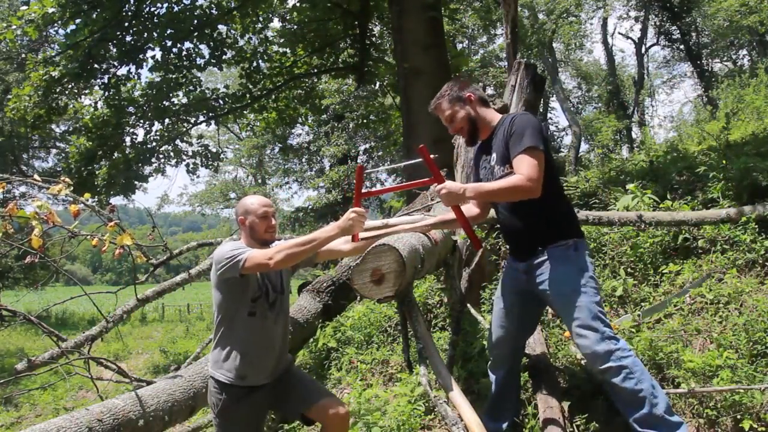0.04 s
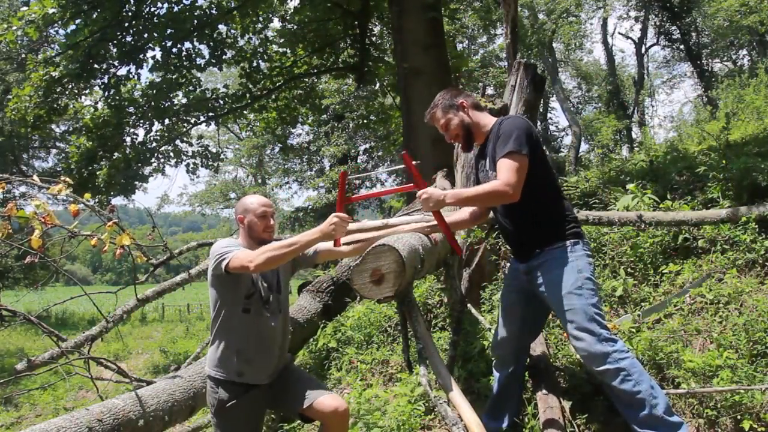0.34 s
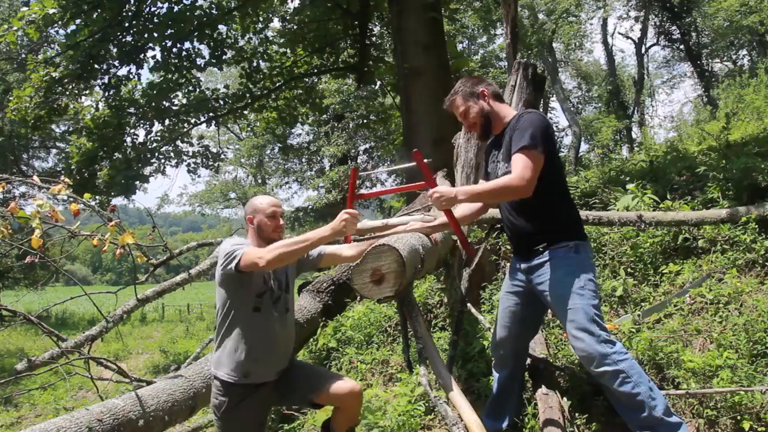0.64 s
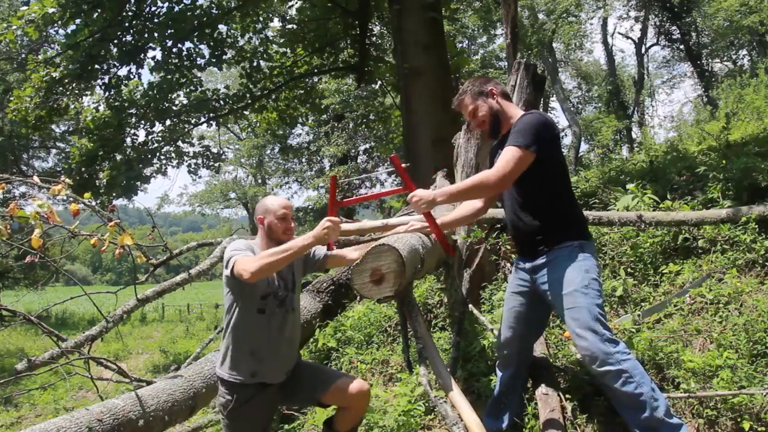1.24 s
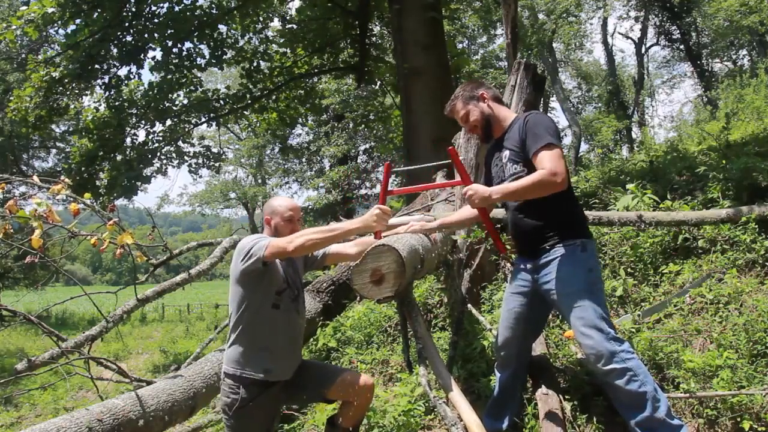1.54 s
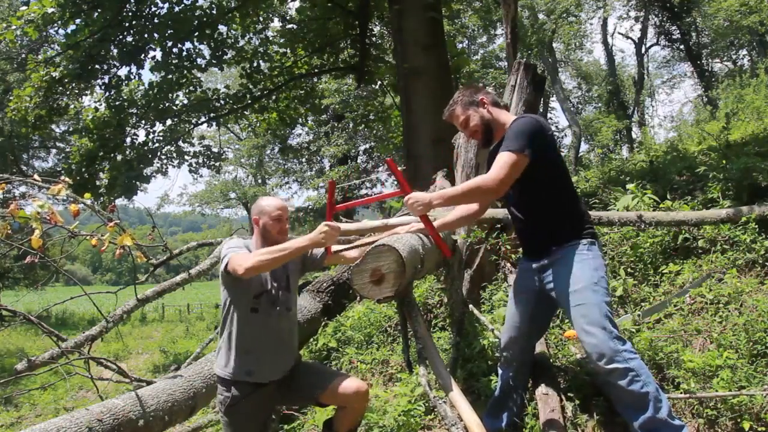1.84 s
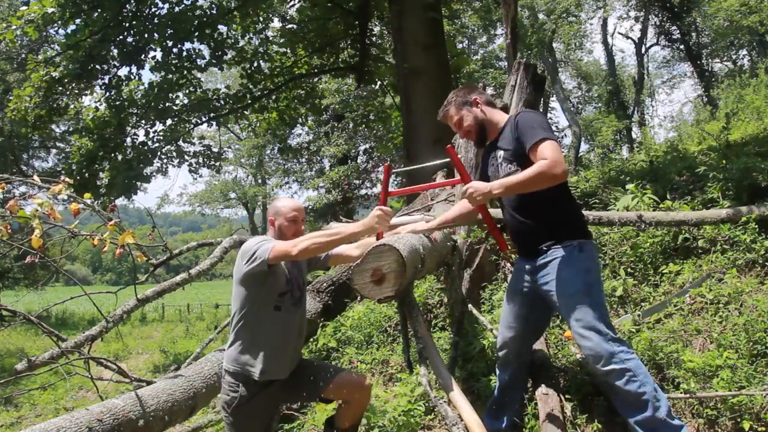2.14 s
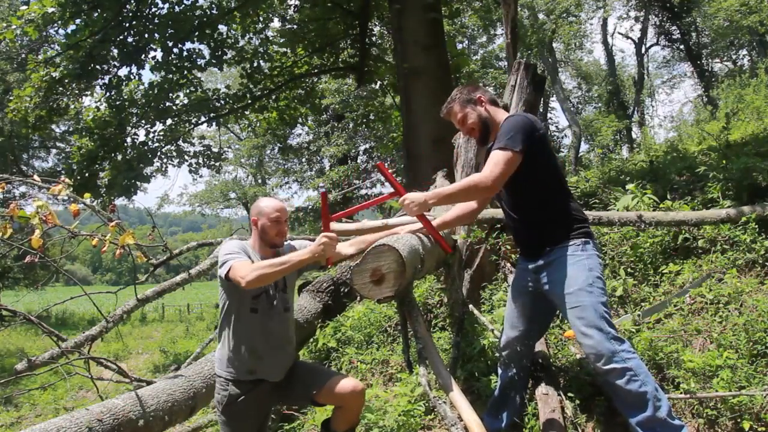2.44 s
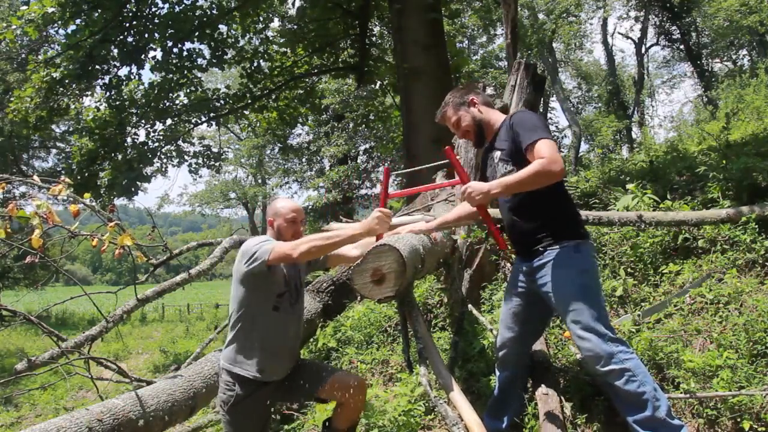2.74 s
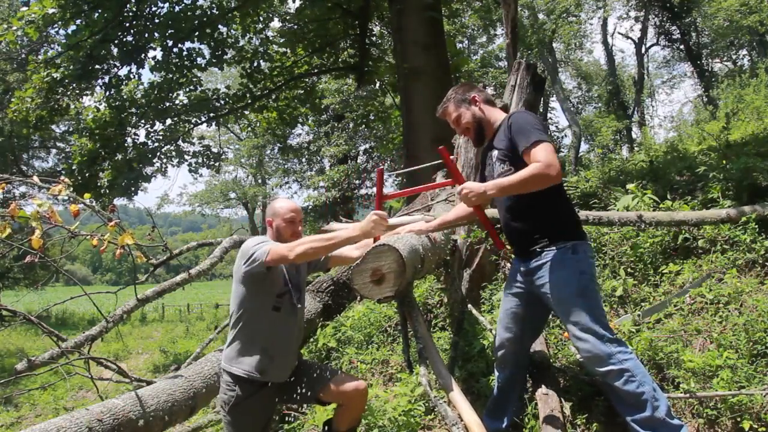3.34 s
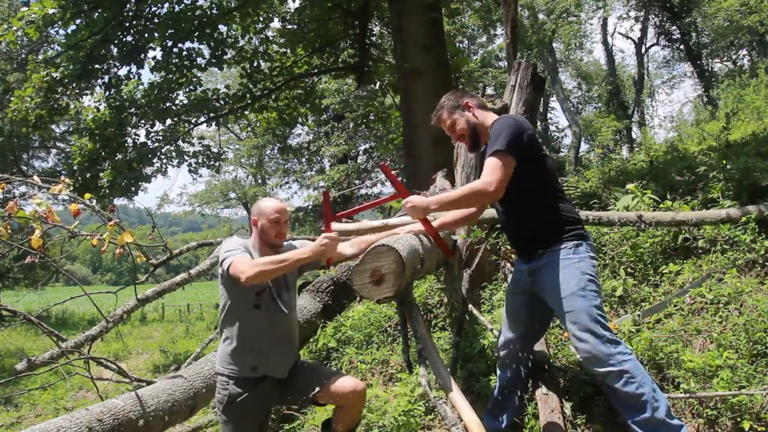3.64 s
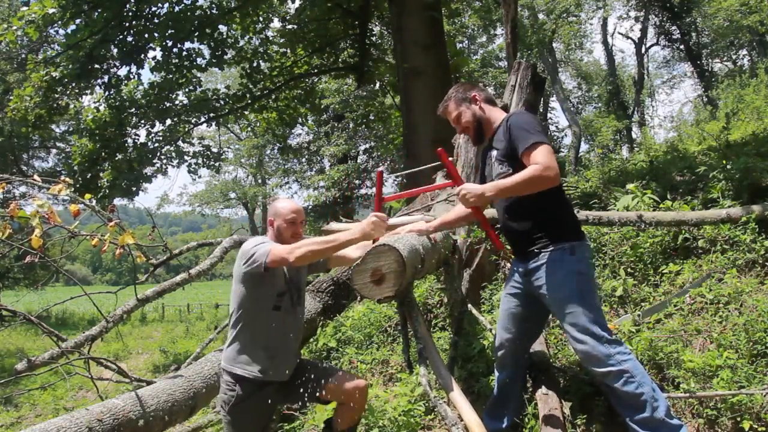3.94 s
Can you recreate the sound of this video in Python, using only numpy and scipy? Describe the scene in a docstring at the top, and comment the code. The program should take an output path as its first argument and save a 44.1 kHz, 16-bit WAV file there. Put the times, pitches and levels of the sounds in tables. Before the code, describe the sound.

A frame saw cuts through a log outdoors, starting with short, thin scrapes and settling into full rasping strokes that make the blade ring. Light wind rumbles on the microphone, fades and returns, over a faint hiss of leaves.

```python
"""Two people pull a frame saw through a log at the edge of a wood, in light wind and a faint hiss.
The first strokes are short and scrape thinly. From about 1 s the saw swings fully back and forth:
teeth tear the fibres in a dense rasp that rings blade and frame, and one direction bites harder.
Between 1.4 and 2.8 s the blade chatters three times on the log while the wind dies down.
The wind then returns, rumbling on the microphone, with its hardest puff near 3.7 s."""
import sys
import numpy as np
from scipy import signal
from scipy.fft import rfft, irfft, next_fast_len
from scipy.io import wavfile
from scipy.ndimage import uniform_filter1d, map_coordinates

SR = 44100
rng = np.random.default_rng(int(sys.argv[2]) if len(sys.argv) > 2 else 0)


def store_pcm(level_fs):
    """Save levels as 16-bit WAV."""
    pcm = np.round(np.clip(level_fs, -1, 1) * 32767).astype(np.int16)
    wavfile.write(sys.argv[1], SR, np.atleast_2d(pcm).T)


N = 176400
TIME_S = np.arange(N) / SR


def saw():
    """Superposition: the cutting force excites a direct rasp, the saw's modes and the blade's tone."""
    treble_hz, woody_hz = 5630, 1110
    speed, position, direction, force, treble_gain, sing_gain = strokes()
    rasping = rasp(force * tearing(speed), direction)
    ringing = saw_modes(force * tearing(speed), position, direction)
    singing = blade_tone(force * sing_gain, position)
    sound = amp(-0.5) * patchy(rasping, depth_db=2.5) + amp(1.5) * ringing
    highs = filtered(sound, lambda hz: hz ** 4 / (hz ** 4 + treble_hz ** 4))
    lows = filtered(sound, lambda hz: woody_hz ** 4 / (hz ** 4 + woody_hz ** 4))
    woody_gain = amp(speed ** 2 - 2)  # a slow blade sounds less woody
    return sound + (treble_gain - 1) * highs + (woody_gain - 1) * lows + singing


# Saw strokes: start_s, end_s, level_db, swell_db, direction (1 biting, -1 return), treble_db, sing_db
SAW_STROKES = [(-.15, 0.11, -51.5, 12, -1, 0, -15), (0.266, 0.493, -40, 10, 1, -2.5, -6),
               (0.474, 0.618, -55, 0, -1, -0.5, -7), (0.627, 0.899, -38.3, -2, -1, -1, -0.5),
               (0.974, 1.274, -33, 2.5, 1, -0.3, -5), (1.315, 1.59, -36, -1.5, -1, -1.5, 0.5),
               (1.641, 1.909, -30.5, 1, 1, -0.5, 1), (1.959, 2.238, -37.5, 6.5, -1, -1.5, -3),
               (2.265, 2.537, -29.5, 6, 1, 0, -0.5), (2.587, 2.872, -35, 0.5, -1, -1, 4.5),
               (2.904, 3.162, -30, 1.5, 1, 0, -1.5), (3.204, 3.483, -38, 0.5, -1, -1.5, -4),
               (3.514, 3.782, -30, 1, 1, 0.5, 3), (3.817, 4.09, -36.5, -2, -1, 0, -3)]
# Teeth catching or skipping: time_s, half_length_s, bite_change_db
TOOTH_CATCHES = [(0.275, 0.024, 10), (0.433, 0.023, 4), (1.036, 0.018, -4.5), (1.061, .025, 3),
                 (1.32, 0.014, 5), (1.365, 0.01, -6.5), (1.454, .02, 2), (1.669, 0.02, -3.5),
                 (1.687, 0.005, 4.5), (1.713, 0.0068, -2.5), (1.971, 0.011, 11.5), (2.296, 0.019, 3.5),
                 (2.633, 0.0067, -6.5), (2.691, 0.018, -5), (3.231, 0.0091, 6.5), (3.292, .02, 1.5),
                 (3.364, 0.026, 3), (3.445, 0.011, 6), (3.664, 0.013, 3), (3.844, 0.0047, 8)]
# Share of the blade in use: time_s, length_fraction
BLADE_REACH = [(0, .25), (.45, 0.22), (.75, 0.86)]
def strokes():
    """Harmonic motion: each stroke is half a cycle; force grows as a power of speed, then saturates."""
    full_bite_speed, speed_exponent, ease_s = 0.71, 1.28, 0.031
    speed, position, direction, force, sing_gain = np.zeros((5, N))
    treble_gain = np.ones(N)
    for start_s, end_s, level_db, swell_db, sign, treble_db, sing_db in SAW_STROKES:
        on = (TIME_S > start_s) & (TIME_S < end_s)
        progress = (TIME_S[on] - start_s) / (end_s - start_s)
        speed[on] = np.sin(np.pi * progress)  # fraction of top speed
        position[on] = sign * np.cos(np.pi * progress)  # highest where a biting stroke starts
        direction[on], treble_gain[on], sing_gain[on] = sign, amp(treble_db), amp(sing_db)
        bite = np.tanh((speed[on] / full_bite_speed) ** speed_exponent)
        force[on] += amp(level_db + swell_db * (progress - .5)) * bite
    position = (position + 1) * np.interp(TIME_S, *np.transpose(BLADE_REACH)) - 1
    catch_db = sum(db * swell(time_s, half_s) for time_s, half_s, db in TOOTH_CATCHES)
    force = np.abs(uniform_filter1d(force, size=int(ease_s * SR)))  # the springy frame eases each turn
    return speed, position, direction, force * amp(catch_db), treble_gain, sing_gain


def tearing(speed):
    """Shot noise: fibres snap and rub, modulated by the passing teeth and the judder of the blade."""
    top_tooth_hz, tooth_db, judder_hz, judder_db = 519, 3.5, 69.54, 1.75
    snap_spread_db, rub_db = 2.5, -1.5
    snap_chance = 6000 * (speed + .1) / SR
    snaps = (rng.random(N) < snap_chance) * rng.choice([-1, 1], N)
    snaps = snaps * amp(snap_spread_db * rng.standard_normal(N))
    grit = unit(snaps / np.sqrt(snap_chance)) + amp(rub_db) * rng.standard_normal(N)
    tooth_hz = top_tooth_hz * speed * (1 + .12 * wobble(60))
    teeth = np.cos(2 * np.pi * np.cumsum(tooth_hz) / SR)
    return unit(grit * amp(tooth_db * teeth + judder_db * wobble(judder_hz)))


# Rasp spectra of the biting and the return stroke: frequency_hz, gain_db
BITE_SPECTRUM = [(100, -4), (280, -1.5), (600, -1), (1200, 2), (2600, 3), (3900, 3), (5200, -3), (7000, -6),
                 (8500, -4.5), (11000, -3.5), (13000, -5.5), (16000, -9)]
RETURN_SPECTRUM = [(100, -22), (280, 2), (600, 3), (1200, -1), (2600, 2.5), (3900, 4), (5200, -0.5),
                   (7000, -3.5), (8500, -1.5), (11000, 0), (13000, -3), (16000, -4.5)]
def rasp(cut, direction):
    """Source and filter: tearing noise radiates from the cut with one spectrum for each direction."""
    biting = filtered(cut * (direction > 0), colour(BITE_SPECTRUM))
    returning = filtered(cut * (direction <= 0), colour(RETURN_SPECTRUM))
    return biting + returning


# Modes of blade and frame: pitch_hz, bandwidth_hz, level_db, position_slope_db, direction_slope_db
SAW_MODES = [(354.2, 16.1, 5.5, 4.5, -4), (456, 39.3, 7.5, 0.5, -1), (631.5, 29, 11, -1, -1),
             (1011, 78, 2.5, 0, -1.5), (1404.7, 36.5, 16, 1.5, -1.5), (1533, 206, 1.5, -1, -1),
             (1833, 110, 1.5, 1, -2.5), (2017, 80, -1.5, 2.5, -3), (2240, 32, 9.5, 3.5, 1),
             (2612, 72, 7, -2.5, -0.5), (2763, 79, 3.5, 8, 6), (3442, 67, 4, 3, -3),
             (3716, 155, 6, -2.5, 0), (4518, 68, 10, 13, -1), (4560, 40, -2, 15, 4.5),
             (5733, 43, 9.5, -0.5, -0.5), (6740, 430, 1.5, -2, -0.5), (7420, 65, 3, 4, -3.5),
             (9420, 50, -1.5, 5, -0.5), (9540, 61, 8, 1.5, -3), (11510, 230, 3, -1, -2),
             (13660, 300, -4.5, 0, -5)]
def saw_modes(drive, position, direction):
    """Forced vibration: how strongly each mode answers depends on where the log meets the blade."""
    frame_hz, deepen_db_per_s, wander_db = 1600, 0.55, 2.5
    deepen_db = deepen_db_per_s * (TIME_S - N / SR / 2)  # low modes grow as the cut deepens
    ring = np.zeros(N)
    for pitch_hz, bandwidth_hz, level_db, position_slope_db, direction_slope_db in SAW_MODES:
        gain_db = level_db + position_slope_db * position + direction_slope_db * direction
        gain_db += deepen_db * (pitch_hz < frame_hz) + wander_db * wobble(22.1)
        ring += resonance(drive * amp(gain_db), pitch_hz, bandwidth_hz)
    return ring


def blade_tone(force, position):
    """Energy storage: the taut blade takes energy from the cut and sings on through the turn."""
    pitch_hz, t60_s, blur_rad, waver_db = 4041, 0.27, 0.91, 0.6
    push = force * amp(-11 + 3.5 * position)
    retained = amp(-120 / (t60_s * SR))  # share of the energy left after one sample
    energy = signal.lfilter([1 - retained], [1, -retained], push ** 2)
    tone = np.sin(2 * np.pi * pitch_hz * TIME_S + blur_rad * wobble(45))
    return np.sqrt(np.abs(energy)) * unit(tone * amp(waver_db * wobble(24.28)))


# Chatter of the blade on the log: time_s, half_length_s, drive_db
BLADE_CHATTER = [(1.444, 0.026, -16.5), (1.753, 0.0076, -22), (2.768, 0.013, -19.5)]
def log_knocks():
    """Resonance: brief bursts of chatter draw a hollow note from the log."""
    pitch_hz = 621
    bursts = sum(amp(db) * swell(time_s, half_s) for time_s, half_s, db in BLADE_CHATTER)
    chatter = unit(filtered(rng.standard_normal(N), lambda hz: hz < 4 * pitch_hz))
    return resonance(bursts * chatter, pitch_hz, bandwidth_hz=22.6)


# Envelope of the opening scrape: time_s, level_db
SCRAPE_ENVELOPE = [(0, -56), (.24, -65), (.3, -66), (.48, -58.5), (.62, -53), (.9, -58), (.94, -79),
                   (.97, -45.5), (1.05, -88)]
# Spectrum of that scrape: frequency_hz, gain_db
SCRAPE_SPECTRUM = [(300, 11), (1500, 2), (5000, -14), (9000, -6), (12000, -11), (16000, -10)]
def scrape():
    """Sliding friction: the barely loaded blade scrapes thinly in the shallow cut."""
    friction = tearing(speed=np.full(N, .25))
    return level(SCRAPE_ENVELOPE) * unit(filtered(friction, colour(SCRAPE_SPECTRUM)))


def trees(sound):
    """Scattering: ground and trunks return a weak, dull tail that decays exponentially."""
    t60_s, cutoff_hz = 0.44, 4700
    delay_s = np.arange(SR // 2) / SR
    tail = rng.standard_normal(len(delay_s)) * amp(-60 * delay_s / t60_s)
    scatter = signal.fftconvolve(sound, tail / np.linalg.norm(tail))[:N]
    return amp(-14) * filtered(scatter, lambda hz: 1 / (1 + (hz / cutoff_hz) ** 2))


# Envelope of the breeze: time_s, level_db
BREEZE_ENVELOPE = [(0, -37.5), (.15, -34), (.8, -34.5), (1.1, -39.5), (1.3, -39), (1.7, -37), (2.0, -43),
                   (2.25, -47.5), (2.5, -55), (2.8, -49.5), (3.0, -40.5), (3.35, -34.5), (3.55, -40),
                   (4, -35.5)]
# Spectrum of its rumble: frequency_hz, gain_db
RUMBLE_SPECTRUM = [(10, -17), (22, -0.5), (34, 2.5), (50, -0.5), (70, 0.5), (100, -5), (150, -11.5),
                   (220, -21), (350, -34), (700, -36), (2000, -55.5)]
# Harder buffets: time_s, half_length_s, peak_db, pitch_hz
WIND_PUFFS = [(1.102, 0.027, -27, 65.6), (3.033, 0.017, -27.5, 56.3), (3.654, 0.019, -21.5, 56)]
def wind():
    """Turbulence: pressure fluctuations on the microphone make a low rumble with a few harder puffs."""
    puffs = np.zeros(N)
    for time_s, half_s, peak_db, pitch_hz in WIND_PUFFS:
        cycles = pitch_hz * (TIME_S - time_s) + rng.random()
        puffs += amp(peak_db) * swell(time_s, half_s) * np.sin(2 * np.pi * cycles)
    gusts = rng.standard_normal(N) * amp(1.5 * wobble(17))
    return puffs + level(BREEZE_ENVELOPE) * unit(filtered(gusts, colour(RUMBLE_SPECTRUM)))


# Spectrum of the outdoor hiss: frequency_hz, gain_db
HISS_SPECTRUM = [(100, 19.5), (450, 10.5), (900, 5), (2000, -3), (2900, 0), (3600, 3.5), (4400, -1.5),
                 (6200, -8), (7000, -2.5), (7450, 5), (8400, -5.5), (10000, -8), (16000, -26)]
def outdoor_hiss():
    """Stationary noise: a faint hiss of leaves, with a high band of distant insects."""
    return amp(-51.5) * unit(filtered(rng.standard_normal(N), colour(HISS_SPECTRUM)))


def amp(db):
    """Decibels to amplitude gain."""
    return 10 ** (np.asarray(db) / 20)


def unit(x):
    """Normalisation to rms 1."""
    return x / np.sqrt(np.mean(x ** 2) + 1e-20)


def colour(points):
    """Frequency response interpolated from (frequency_hz, gain_db) points."""
    frequency_hz, gain_db = np.transpose(points)
    return lambda hz: amp(np.interp(np.log(hz + 1), np.log(frequency_hz + 1), gain_db))


def level(points):
    """Amplitude envelope interpolated from (time_s, level_db) points."""
    return amp(np.interp(TIME_S, *np.transpose(points)))


def swell(time_s, half_length_s):
    """Gaussian envelope centred on time_s."""
    return np.exp(-((TIME_S - time_s) / half_length_s) ** 2)


def wobble(rate_hz):
    """Smooth random modulation with rate_hz knots a second."""
    return map_coordinates(rng.standard_normal(N // 16), [TIME_S * rate_hz], mode="wrap")


def patchy(x, depth_db):
    """Random amplitude modulation in small patches of time and frequency."""
    spectrogram = signal.stft(x, nperseg=1024)[2]
    field = uniform_filter1d(rng.standard_normal(spectrogram.shape), size=5, axis=0)
    field = uniform_filter1d(field, size=6, axis=1)
    return signal.istft(spectrogram * amp(depth_db * unit(field)))[1][:N]


def filtered(x, response):
    """Linear filtering: the spectrum of x times a frequency response."""
    size = next_fast_len(N + SR // 2)
    return irfft(rfft(x, size) * response(np.fft.rfftfreq(size, 1 / SR)), size)[..., :N]


def resonance(x, pitch_hz, bandwidth_hz):
    """A damped oscillator driven by x, its far skirts trimmed."""
    def response(hz):
        damping = 1j * hz * bandwidth_hz
        skirt = 1 + ((hz - pitch_hz) / (pitch_hz / 4)) ** 2
        return damping / (pitch_hz ** 2 - hz ** 2 + damping) / skirt
    return filtered(x, response)


def scene():
    """Superposition: sawing, its scatter, wind and hiss reach both channels alike."""
    sawing = saw() + log_knocks() + scrape()
    return np.tile(sawing + trees(sawing) + wind() + outdoor_hiss(), (2, 1))


def record(dry):
    """Band limiting: an ideal low-pass filter removes the highest treble."""
    return filtered(dry, lambda hz: hz < 15800)


dry = scene()
out = record(dry)
store_pcm(out)
```